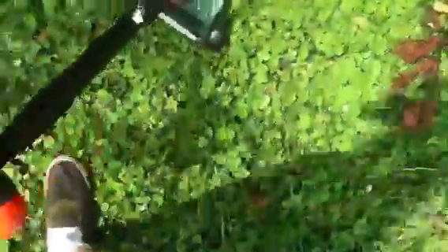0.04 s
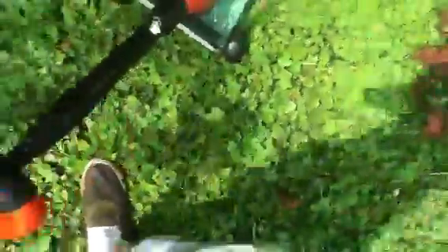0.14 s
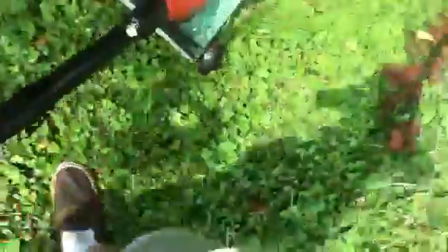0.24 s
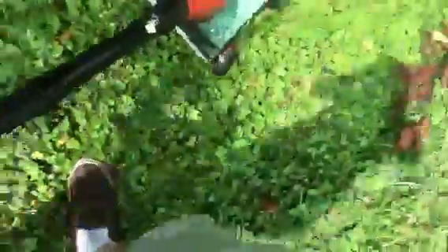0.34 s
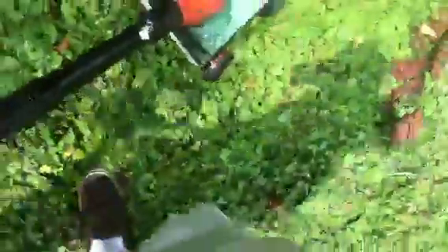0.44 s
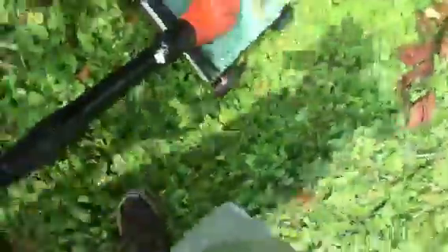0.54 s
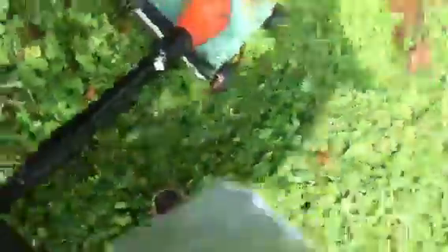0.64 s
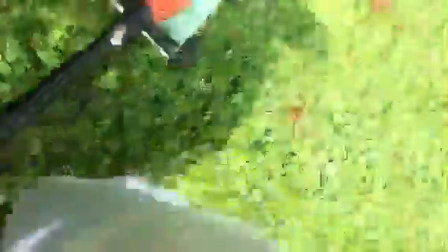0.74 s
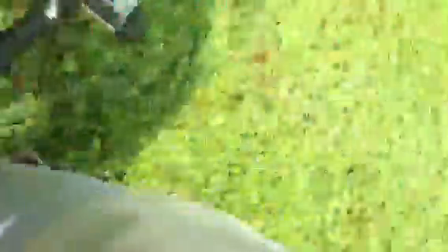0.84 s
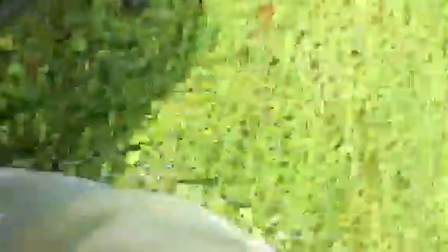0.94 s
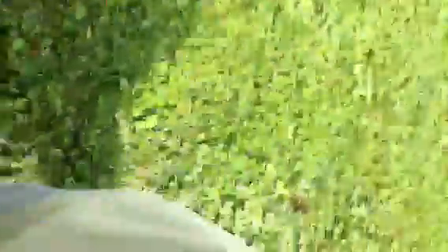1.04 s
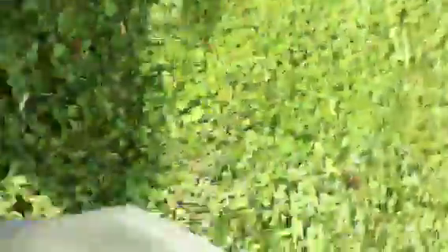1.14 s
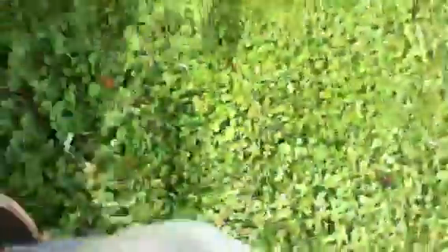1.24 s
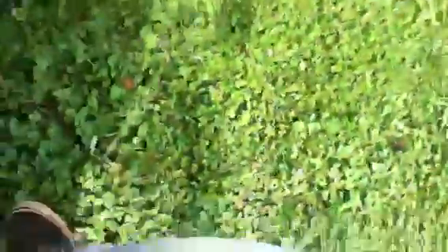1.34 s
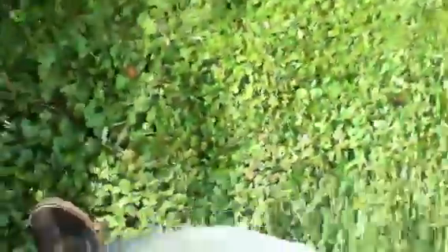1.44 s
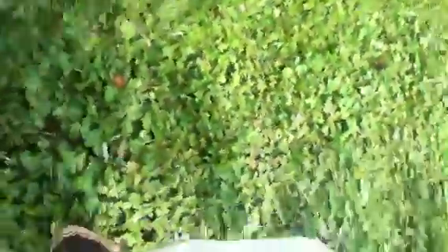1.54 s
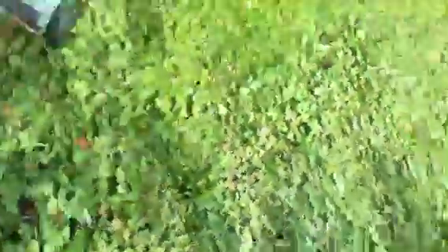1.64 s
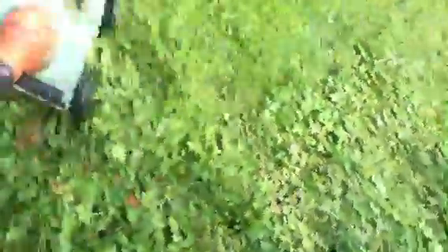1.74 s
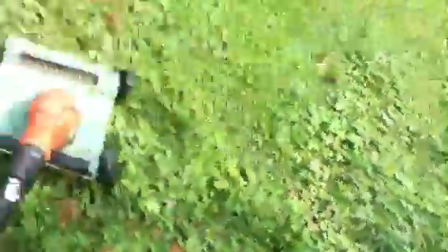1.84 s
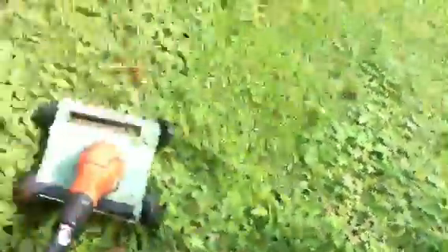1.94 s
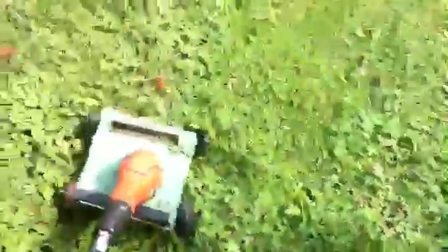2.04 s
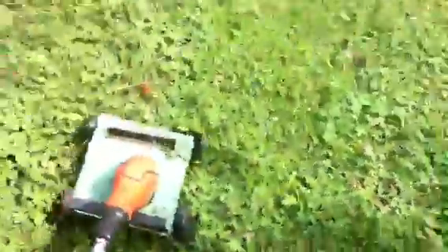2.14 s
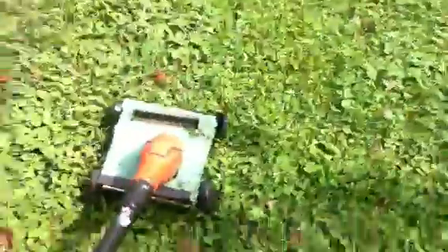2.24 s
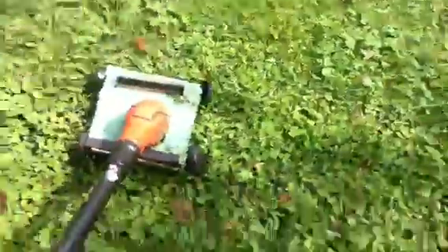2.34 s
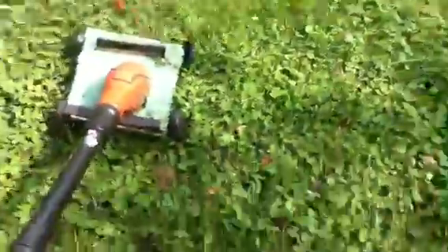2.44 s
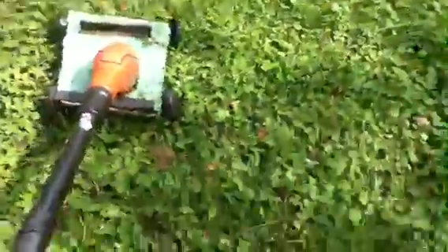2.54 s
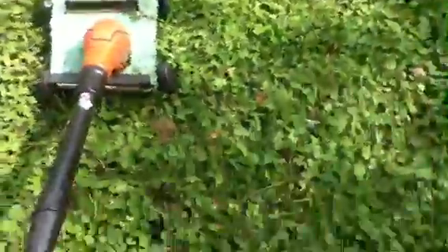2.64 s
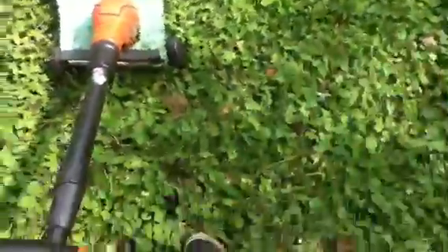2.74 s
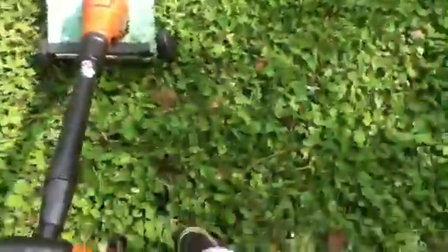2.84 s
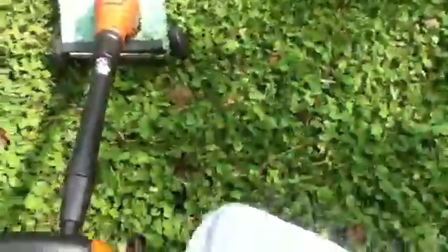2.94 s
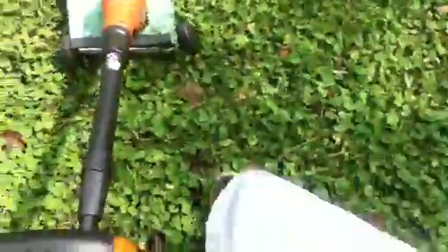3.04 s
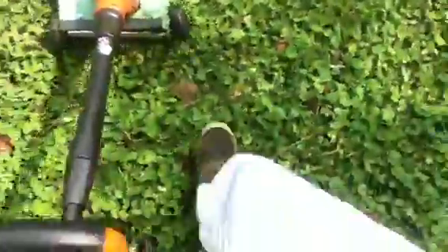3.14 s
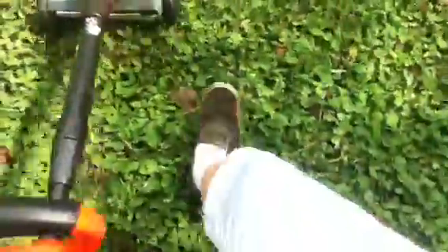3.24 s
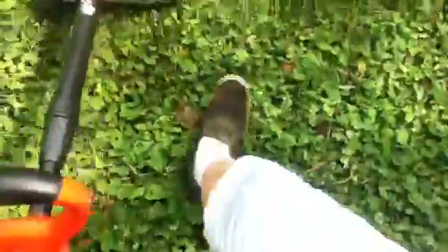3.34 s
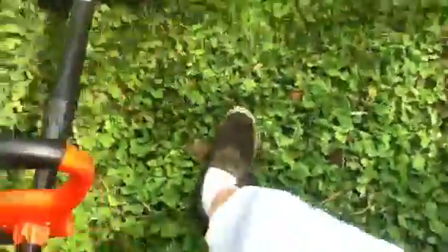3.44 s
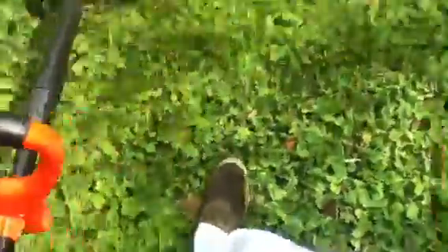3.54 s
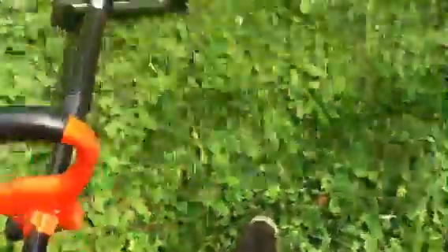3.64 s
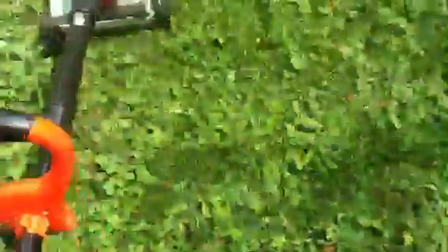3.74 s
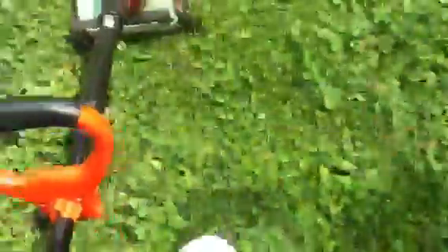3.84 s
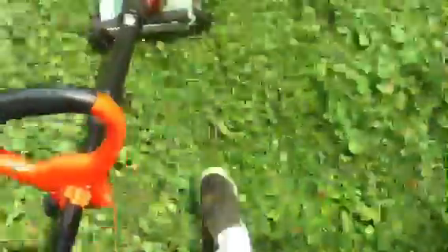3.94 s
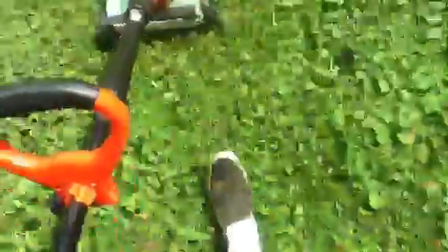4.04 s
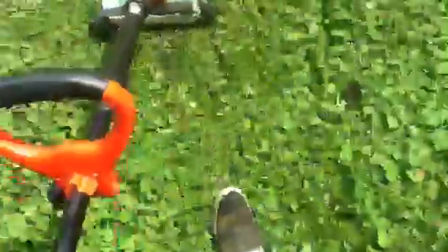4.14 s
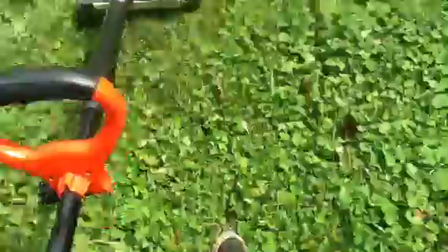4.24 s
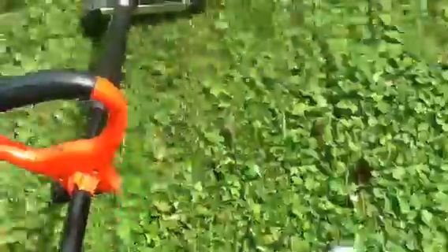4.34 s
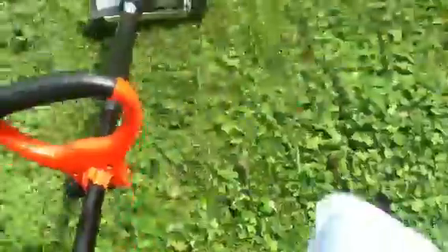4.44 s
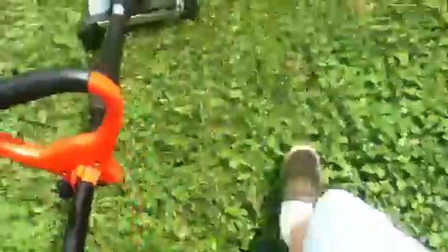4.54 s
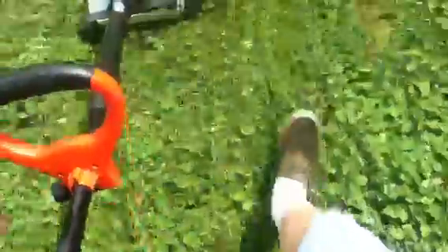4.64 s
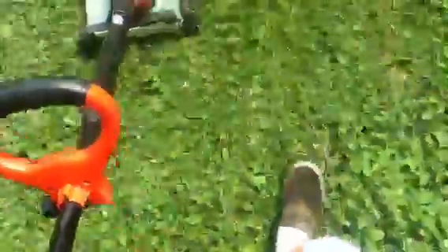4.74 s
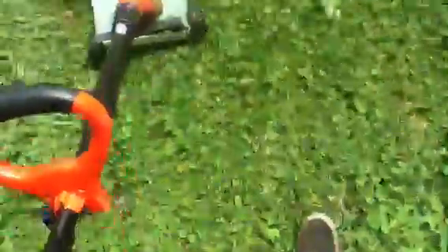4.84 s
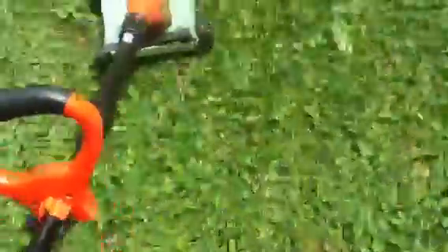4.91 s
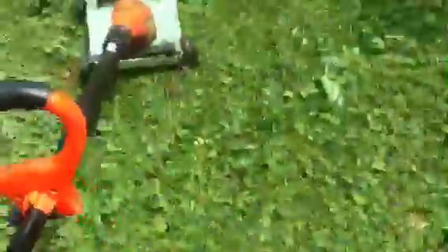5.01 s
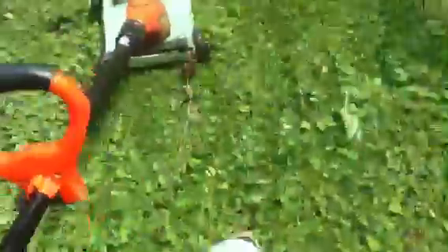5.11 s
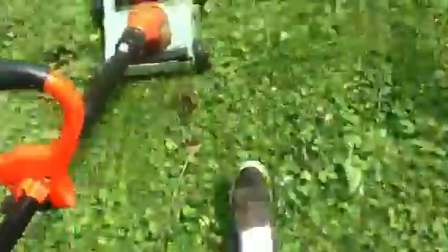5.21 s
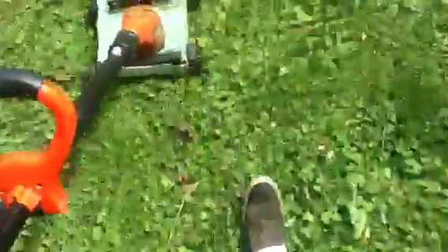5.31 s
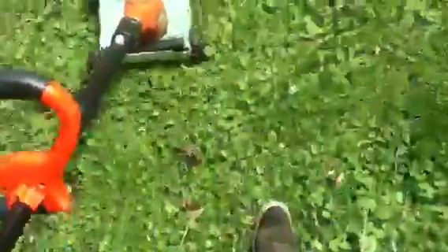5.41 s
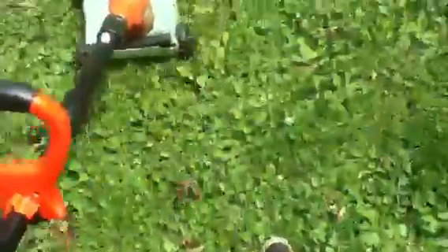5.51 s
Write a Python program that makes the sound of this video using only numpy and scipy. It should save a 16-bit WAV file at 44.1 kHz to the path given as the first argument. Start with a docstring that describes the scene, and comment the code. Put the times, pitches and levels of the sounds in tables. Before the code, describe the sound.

In a quiet garden, a nearby electric string trimmer coasts down with a falling, fluttering whirr and light ticks against stems. It stops with a few dull knocks, and a faint rustle follows. The trigger clicks sharply and the motor whines up. The line bogs down in thick plants, cracking and chopping, then breaks free into a higher, steadier whirr. Faint distant traffic lies behind.

```python
"""A quiet garden, where an electric string trimmer on a small wheeled deck cuts clover.
It coasts to a stop, the trigger clicks, and the motor whines up. The spool whirls two ends of line,
which bog down in thick plants and then run free. Each pass of a line end stirs the air, slaps stems
and rings the plastic deck. Far traffic, a soft hiss and a short rustle lie behind."""
import sys
import numpy as np
from scipy import signal
from scipy.fft import rfft, irfft, next_fast_len
from scipy.io import wavfile
from scipy.ndimage import uniform_filter1d, map_coordinates

SR = 44100
rng = np.random.default_rng(int(sys.argv[2]) if len(sys.argv) > 2 else 0)


def dump_mix(stems):
    """Bounce the given channels to the path in sys.argv[1] as a 16-bit WAV at rate SR."""
    frames = np.atleast_2d(stems).T  # one column per channel
    limited = np.clip(frames, -1, 1)  # hard clip at full scale
    pcm = np.round(limited * 32767).astype(np.int16)
    wavfile.write(sys.argv[1], SR, pcm)


N = 245637
TIME_S = np.arange(N) / SR
STOP_S, TRIGGER_S = 2.33, 2.866  # the spool falls silent; the power comes on
COAST_FROM_HZ = 68.03  # spool turns a second at the start

# How loud the deck and the air are under power: time_s, boom_db, whirr_db
WORK_LEVELS = [(2.875, -29, -38), (2.93, -54, -24), (2.98, -24.5, -17.5), (3.08, -19, -13),
               (3.14, -19, -14), (3.18, -24.5, -19.5), (3.33, -23, -18), (3.45, -30, -14), (3.58, -33, -18),
               (3.66, -19.5, -18), (3.715, -32, -20), (3.78, -23.5, -18), (3.88, -16.5, -14),
               (3.97, -20.5, -15), (4.0, -31, -18), (4.07, -18.5, -14.5), (4.15, -24, -17.5),
               (4.27, -18, -16), (4.32, -47, -20), (4.45, -46, -18), (4.52, -37, -11.5), (4.64, -40, -13),
               (4.73, -35, -13), (5.57, -30.5, -11.5)]
# The notes at which the plastic shell rings: pitch_hz, width_hz, level_db
SHELL_NOTES = [(1020, 160, -3), (1220, 220, 0), (1700, 400, -12), (2270, 300, -12), (3100, 500, -10),
               (4890, 600, -18), (7300, 1200, -20)]


def amp(db):
    """Turn decibels into a gain."""
    return 10 ** (np.asarray(db) / 20)


def unit(x):
    """Scale x to an average (rms) level of 1."""
    return x / np.sqrt(np.mean(x ** 2) + 1e-20)


def levelled(x):
    """Hold x at a steady level of 1, however fast its pulses come."""
    return x / np.sqrt(np.abs(uniform_filter1d(x ** 2, size=SR // 6)) + 1e-12)


def curves(rows):
    """Join timed rows with straight lines, one curve for each column after the time."""
    times, *columns = np.transpose(rows)
    return [np.interp(TIME_S, times, column) for column in columns]


def wobble(rate):
    """A smooth curve through `rate` random points a second."""
    return map_coordinates(rng.standard_normal(int(N * rate / SR) + 4), [TIME_S * rate])


def swells(rows):
    """A bell-shaped gain for each row of time_s, level_db, half_length_s."""
    return sum(amp(db) * np.exp(-((TIME_S - s) / half) ** 2) for s, db, half in rows)


def filtered(x, response):
    """Give each frequency f in x the gain response(f)."""
    size = next_fast_len(N + SR // 2)
    return irfft(rfft(x, size) * response(np.fft.rfftfreq(size, 1 / SR)), size)[:N]


def modes(notes):
    """The response of a small body, weak in bass, that rings at rows of pitch_hz, width_hz, level_db."""
    def response(f):
        peaks = sum((-1) ** k * amp(db) * 1j * f * width / (hz * hz - f * f + 1j * f * width)
                    for k, (hz, width, db) in enumerate(notes))
        return peaks * (1j * f / (1j * f + 240)) ** 3
    return response


def ringing(x, notes):
    """Put ringing peaks on top of x."""
    return unit(filtered(x, lambda f: 1 + np.abs(modes(notes)(f)) ** 2))


def rush(spectrum, patchy_db):
    """Noise shaped by rows of pitch_hz, level_db, with random louder and softer patches."""
    bands = signal.stft(rng.standard_normal(N), nperseg=256)[2]
    patches = uniform_filter1d(uniform_filter1d(rng.standard_normal(bands.shape), 4, 0), 16, 1)
    noise = signal.istft(bands * amp(patchy_db * unit(patches)), nperseg=256)[1][:N]
    hz, db = np.transpose(spectrum)
    return unit(filtered(noise, lambda f: amp(np.interp(np.log(f + 1), np.log(hz + 1), db))))


def smeared(pulses, fade_s, rough):
    """Turn each pulse into a short burst, from a smooth push (rough=0) to pure crackle (rough=1)."""
    pole = amp(-60 / (fade_s * SR))
    burst = signal.lfilter([np.e * (1 - pole)], [1, -2 * pole, pole ** 2], pulses)
    return burst * (1 - rough + rough * rng.standard_normal(N))


def garden():
    """Far traffic and air, a faint wavering tone, a hiss, a rustle and puffs on the microphone."""
    # Tone colour of the traffic and air, and of the hiss and rustle: pitch_hz, level_db
    far_colour = [(15, -64), (25, -36), (50, -27), (87, -14.5), (206, -18.5), (300, -10.5), (600, -16),
                  (861, -19), (1040, -21), (3070, -37.5), (15900, -49)]
    rustle_colour = [(300, -22), (1000, 3), (3000, -1), (8000, -4), (15000, -17)]
    # A soft hiss as the spool comes to rest, then a short rustle: time_s, level_db, half_length_s
    rustles = [(2.22, -50.5, 0.18), (2.59, -45, 0.052)]
    # Puffs of air: time_s, level_db, half_length_s
    air_puffs = [(3.6, -59, 0.022), (4.01, -54, .02), (4.13, -42, 0.037), (4.22, -49, 0.056)]
    far = amp(-43.5 + .5 * wobble(3)) * rush(far_colour, patchy_db=.8)
    tone = amp(-51) * unit(filtered(rng.standard_normal(N), lambda f: modes([(880, 30, 0)])(f) ** 2))
    rustle = swells(rustles) * amp(1.3 * wobble(100)) * rush(rustle_colour, patchy_db=2)
    puffs = swells(air_puffs) * rush([(15, -6), (30, 0), (70, -6), (150, -30), (400, -90)], patchy_db=0)
    return far + tone + rustle + puffs


def knocks():
    """Short plastic cracks ring the handle; dull ones start more slowly and have less treble."""
    # Trigger and gear knocks: start_s, level_db, fade_s (to fall 60 dB), dullness (0 to 1)
    hits = [(2.074, -27, .03, .93), (2.1586, -31, .012, 0), (2.184, -31, 0.025, 0.7),
            (2.226, -29, 0.04, 0.9), (2.263, -25, 0.05, 0.9), (2.272, -19, 0.035, 0.75),
            (2.289, -23, 0.035, 0.88), (2.834, -27.5, 0.067, 0.9), (2.858, -19, 0.44, 0.53),
            (2.864, -2.5, 0.026, 0), (2.867, -1, 0.018, 0.04)]
    out, t = np.zeros(N), np.arange(SR // 10) / SR
    for s, db, fade_s, dull in hits:
        noise = unit(signal.lfilter([1], [1, -dull], rng.standard_normal(len(t))))
        attack = 1 - np.exp(-t / (.002 * max(dull, .02)))
        out[round(s * SR):][:len(t)] += amp(db - 60 * t / fade_s) * attack * noise
    handle = [(556, 1340, 3), (1370, 510, 9), (2170, 2000, 1), (4900, 4100, -.5), (9950, 2200, -10)]
    return filtered(out, modes(handle))


def spool():
    """Friction slows the spool, then the motor pulls it up. Gives power on, held speed, true speed."""
    # The speed the motor can hold against the plants: time_s, turns_per_s
    held_speeds = [(2.86, 94), (3.1, 91), (3.38, 102), (3.61, 103), (3.71, 91.8), (3.85, 87), (3.96, 81.5),
                   (4.28, 81.8), (4.37, 95.2), (4.49, 104.5), (4.6, 108.6), (4.8, 110.5), (5.57, 111.5)]
    friction_hz, coast_s, pull_up_s = 52.67, 3.064, .08
    on, (held,) = TIME_S > TRIGGER_S, curves(held_speeds)
    coast = (COAST_FROM_HZ + friction_hz) * np.exp(-TIME_S / coast_s) - friction_hz
    pull = held * (1 - np.exp(-np.abs(TIME_S - TRIGGER_S) / pull_up_s))
    return on, held, np.maximum(np.where(on, pull, coast), 3)


def line_state():
    """How bogged down, free-running and taut the line is, each up to 1; a slow line goes limp."""
    on, held, speed = spool()
    bogged = on * np.clip((96 - held) / 9, 0, 1) ** 2
    free = np.clip((speed - 101) / 6, 0, 1)
    taut = np.clip((speed - 18) / 24, .05, 1)
    return bogged, free, taut


def spool_gain(powered_db, coast_db, halving_db):
    """Follow powered_db under power; coasting starts at coast_db and loses halving_db as speed halves."""
    on, _, speed = spool()
    last_fade = np.clip((STOP_S - TIME_S) / .46, 0, 1)
    coasting = last_fade * amp(coast_db + halving_db * np.log2(speed / COAST_FROM_HZ))
    return np.where(on, amp(powered_db), coasting)


def line_passes(turns):
    """One pulse whenever a line end passes the guard; the second end strikes more weakly."""
    on, _, _ = spool()
    bogged, free, _ = line_state()
    at = np.flatnonzero(np.diff(np.floor(2 * turns + .03 * wobble(150))) > 0)
    second_end = np.round(2 * turns[at]) % 2
    weak_db, scatter_db = -3.5 - 12.5 * bogged - 1.5 * free, .7 + 1.1 * on
    pulses = np.zeros(N)
    pulses[at] = amp(weak_db[at] * second_end + scatter_db[at] * rng.standard_normal(len(at)))
    return pulses


def gear_whine():
    """A rough, fluttering gear tone and its octave sweep up, then fade as the motor nears full speed."""
    # Gearbox notes that boost the whine as it crosses them: pitch_hz, width_hz, level_db
    gearbox = [(1200, 200, 4), (2550, 250, 2.5), (3200, 400, 1), (4300, 600, 4)]
    cycles_per_turn, end_s, fade_s = 41.5, 3.035, .03
    on, held, speed = spool()
    level = on * np.exp(-np.maximum(TIME_S - end_s, 0) / fade_s)
    rise = np.clip(speed / held, 0, 1)
    pitch_hz = cycles_per_turn * speed * (1 + .04 * rise * wobble(150))
    phase = 2 * np.pi * np.cumsum(pitch_hz) / SR + 1.5 * rise ** 2 * wobble(500)
    tone = amp(-26.5 + 4.5 * wobble(130)) * rise ** .05 * np.sin(phase)
    octave = amp(-32 + 3 * wobble(90)) * rise * np.sin(2 * phase)
    return filtered(level * (tone + octave), lambda f: 1 + np.abs(modes(gearbox)(f)) ** 2)


def motor_hum(turns):
    """Wavering tones at multiples of the spool speed, plus one falling tone as the motor coasts."""
    # The tones of the hum: speed_multiple, free_db, loaded_db
    harmonics = [(1, -21.5, -37), (2, -15, -14), (3, -3.5, -13), (4, 2, -3.5), (5, 1.5, -4), (6, -1, -2.5),
                 (7, -4, -8.5), (8, -2.5, -15), (9, 1, -7.5), (10, -12, -14), (11, 3, -25), (12, 2, -11),
                 (13, 3, -25), (14, -13, -25), (16, -2, -18), (17, -3, -18), (18, 0.5, -18)]
    # Extra level for the second and fourth multiples: time_s, second_db, fourth_db
    lifts = [(3.04, -14, 0), (3.07, 8, 4), (3.55, 9, 8), (3.63, 0, 1), (3.93, 0, 0), (4.0, -10, -3),
             (4.3, -10, -3), (4.45, 1, -2)]
    on, held, speed = spool()
    bogged, free, _ = line_state()
    level = spool_gain(-31 + .28 * (held.max() - held) - 6 * bogged, coast_db=-45, halving_db=12)
    level *= np.where(on, speed / held, 1) ** 4
    second_db, fourth_db = on * curves(lifts)
    waver = (.5 - .27 * free) * wobble(16)
    hum = np.zeros(N)
    for k, free_db, loaded_db in harmonics:
        db = free * free_db + (1 - free) * (loaded_db - 1.5) + second_db * (k == 2) + fourth_db * (k == 4)
        flutter_db = (3.3 - free) * wobble(24) / (2 if k in (2, 4) else 1)
        hum += amp(db + flutter_db) * np.sin(2 * np.pi * (k * turns + rng.random()) + k * waver)
    rotor_level = swells([(.95, -45, .4)]) * amp(4.3 * wobble(8.8))
    return level * hum + rotor_level * np.sin(2 * np.pi * 8.5 * turns + 2 * waver)


def singing():
    """Narrow bands of the whirr sing out as brief, rough tones, which slide down while the spool slows."""
    # The tones: time_s, level_db, half_length_s, pitch_hz
    tones = [(.08, -30, 0.14, 3080), (.42, -39, .1, 7150), (.45, -29.5, .11, 3050), (.45, -38, .05, 4900),
             (.66, -30, .08, 3100), (0.74, -36, 0.1, 4880), (.85, -36, .07, 3900), (0.84, -42, .1, 7600),
             (1.0, -32, 0.08, 3300), (1.25, -35, .07, 3250), (1.33, -33, .03, 2950), (1.44, -43, .08, 6400),
             (1.47, -34, 0.1, 2800), (1.72, -37, 0.1, 3780), (3.399, -25, 0.18, 2647),
             (4.39, -23, .06, 1270), (4.42, -28, .05, 3900), (4.526, -19, 0.0583, 3870),
             (4.554, -26, 0.1, 1462), (4.75, -24, .12, 1440), (4.98, -24, .06, 2700),
             (5.148, -21.5, .1, 3926), (5.151, -27, 0.09, 1233), (5.354, -25, 0.11, 4240)]
    out, flutter_db = np.zeros(N), 2.2 * wobble(90)
    for s, db, half, hz in tones:
        at = np.arange(max(0, round((s - 3 * half) * SR)), min(N, round((s + 3 * half) * SR)))
        t = at / SR - s
        sag_per_s = .35 * (s < STOP_S)
        stumble = .15 * np.cumsum(rng.standard_normal(len(at)))
        phase = 2 * np.pi * hz * (t - sag_per_s * t ** 2 / 2) + stumble
        out[at] += amp(db + flutter_db[at]) * np.exp(-(t / half) ** 2) * np.sin(phase)
    return out


def coasting_air():
    """The upper bands of the coasting whirr drift lower and the treble fades."""
    # Tone colour of the slow whirr: pitch_hz, level_db
    colour = [(90, -55), (150, -30), (380, -9), (555, -4), (773, -6), (1170, -7), (2090, -9), (3150, -9),
              (7440, -16), (13100, -30), (15900, -50)]
    # Bands that stand out in the coasting whirr: pitch_hz, width_hz, level_db
    bands = [(560, 120, -5), (1180, 300, 0), (3050, 450, -5), (3950, 450, -6), (4890, 300, -6),
             (7450, 600, -9)]
    _, _, speed = spool()
    _, _, taut = line_state()
    lowered = [(hz * (.91 if hz > 2000 else 1), width, db) for hz, width, db in bands]
    noise = rush(colour, patchy_db=1.5)
    air = taut * ringing(noise, bands) + (1 - taut) * ringing(noise, lowered)
    bright = np.clip(speed / COAST_FROM_HZ, 0, 1) ** .5
    return bright * air + (1 - bright) * filtered(air, lambda f: 1 / (1 + (f / 3530) ** 2))


def whirr(pulses):
    """Air rushes round the line as it coasts, cuts or runs free, and swells at each pass."""
    # Tone colour under load and at full speed: pitch_hz, level_db
    cutting_colour = [(90, -61), (150, -40), (230, -15), (400, -11), (566, -7), (790, -11), (1500, -7),
                      (2700, -5), (3480, -9.5), (7160, -12), (14200, -25), (15900, -39)]
    free_colour = [(88, -76), (150, -68), (225, -16.5), (439, -4), (820, -12), (1240, -4), (3220, -7.5),
                   (3990, -4), (8530, -11), (15900, -31.5)]
    # Notes of the housing at full speed: pitch_hz, width_hz, level_db
    housing = [(1190, 62, -14), (1365, 44, -3.5), (2490, 790, -0.5), (3910, 130, 1.5), (4150, 470, -4),
               (6120, 170, -3.5)]
    on, _, _ = spool()
    bogged, free, taut = line_state()
    _, whirr_db = curves(WORK_LEVELS)
    cutting = rush(cutting_colour, patchy_db=1.3)
    hiss = filtered(cutting, lambda f: 1 / (1 + (6000 / (f + 1)) ** 4))
    cutting -= .25 * bogged * hiss  # thick plants muffle the hiss
    running_free = ringing(rush(free_colour, patchy_db=.96), housing)
    air = ~on * coasting_air() + on * (1 - free) ** .5 * cutting + free ** .5 * running_free
    gust = taut * levelled(smeared(pulses, fade_s=.01, rough=0))
    steady = .52 - .065 * ~on * taut - .14 * bogged
    depth = .28 + .089 * ~on - .13 * free + .035 * bogged
    level = spool_gain(whirr_db, coast_db=-21.5, halving_db=5.45) * amp((.44 + bogged) * wobble(40))
    sung = singing() * (.45 + .55 * (1 - free) * gust + .5 * free)
    return level * air * (steady + depth * gust) + sung


def struck(pulses, notes, fade_s, rough):
    """A taut line rings a body with each pass; a limp line drags on it instead."""
    _, _, taut = line_state()
    hits = levelled(filtered(smeared(pulses, fade_s, rough), modes(notes)))
    drag = amp(2 * wobble(90)) * unit(filtered(rng.standard_normal(N), modes(notes)))
    return taut * hits + (1 - taut ** 2) ** .5 * drag


def line_strikes(pulses):
    """Each pass booms in the hollow deck, slaps the shell and, while cutting, adds a bright chop."""
    # Notes of the hollow under the deck: pitch_hz, width_hz, level_db
    hollow = [(290, 110, -10), (410, 130, -8), (570, 170, 0), (690, 120, -5)]
    # The coasting line catches on the guard: time_s, level_db, half_length_s
    catches = [(.95, -37.5, 0.42), (2.285, -48, 0.058)]
    on, _, _ = spool()
    bogged, free, _ = line_state()
    boom_db, whirr_db = curves(WORK_LEVELS)
    boom = struck(pulses, hollow, fade_s=.009, rough=.6)
    boom = filtered(boom, lambda f: (1j * f / (1j * f + 150)) ** 2)  # thin out the bass
    boom *= spool_gain(boom_db, coast_db=-27, halving_db=10.1)
    slap = amp(.8 * wobble(8)) * struck(pulses, SHELL_NOTES, fade_s=.007, rough=.65)
    slap *= spool_gain(whirr_db - 18.5 - 4 * bogged, coast_db=-35, halving_db=.79) + swells(catches)
    snaps = smeared(pulses * amp(3 * rng.standard_normal(N)), fade_s=.005, rough=1)
    chop = unit(filtered(snaps, modes([(8200, 1700, 0)])))
    chop *= on * (1 - free) * amp(whirr_db - 20.5 - 1.9 * bogged)
    return boom + slap + chop


def stem_cracks():
    """Hard stems crack against the line and ring the shell; a stem that parts adds a bright snap."""
    # The hardest slaps on stems: start_s, crack_db, snap_db
    hits = [(.0418, -14, -30), (.0852, -14, -30), (.1316, -14, -30), (.2773, -12, -24), (0.3393, -15, -30),
            (.3546, -14, -26), (0.3742, -18, -30), (0.3916, -15, -28), (0.603, -14, -28), (0.679, -17, -34),
            (0.7032, -12, -30), (0.7255, -13, -30), (0.775, -13, -30), (0.8508, -16, -34),
            (0.874, -16, -32), (0.901, -17, -32), (3.0686, -8, -12), (3.1179, -10, -7), (3.2138, -12, -11),
            (3.325, -6, -10), (3.4093, -14, -9), (3.514, -12, -8), (3.545, -11, -10), (3.6023, -14, -9),
            (3.7568, -9, -6), (3.7675, -6, -12), (3.8129, -12, -16), (3.8364, -1, -14), (3.8468, -10, -10),
            (3.8816, 0, -12), (3.9057, -8, -10), (3.9172, -5, -11), (3.956, -3, -13), (4.0044, -10, -8),
            (4.029, -12, -9), (4.0398, -5, -8), (4.0645, -8, -11), (4.0763, -6, -10), (4.0889, -7, -11),
            (4.1262, -4, -8), (4.1369, -8, -8), (4.1515, -10, -7), (4.187, -1.5, -8), (4.223, -6, -12),
            (4.2483, -8, -11), (4.2604, -4.5, -12)]
    cracks, snaps = np.zeros((2, N))
    for s, crack_db, snap_db in hits:
        cracks[round(s * SR)], snaps[round(s * SR)] = amp(crack_db), amp(snap_db)
    shell, stem = modes(SHELL_NOTES), modes([(1790, 750, -1), (4500, 1500, -10)])
    cracks = smeared(cracks, fade_s=.0065, rough=.83)
    body = filtered(cracks, lambda f: amp(3) * shell(f) + amp(4) * stem(f))
    bright = filtered(smeared(snaps, fade_s=.008, rough=1), modes([(8500, 7000, -1)]))
    return filtered(body + bright, lambda f: 1 / (1 + 1j * f / 11000) ** 2)  # soften the top treble


def trimmer():
    """Hum, whirr and strikes all keep time with the turning spool."""
    on, _, speed = spool()
    turns = np.where(on, np.cumsum(on * speed) / SR + .18, np.cumsum(speed) / SR + .22)
    pulses = line_passes(turns)
    return motor_hum(turns) + whirr(pulses) + line_strikes(pulses)


def scene():
    """The garden and all the sounds of the trimmer in one channel."""
    return (garden() + knocks() + gear_whine() + stem_cracks() + trimmer())[None]


def record(dry):
    """Peaks round off softly; the microphone drops deep bass and the highest treble."""
    soft = dry[0] / (1 + np.abs(dry[0] / .72) ** 4) ** (1 / 4)
    return filtered(soft, lambda hz: (hz < 16050) * (1j * hz / (1j * hz + 35)) ** 2)[None]


dry = scene()
out = record(dry)
dump_mix(out)
```